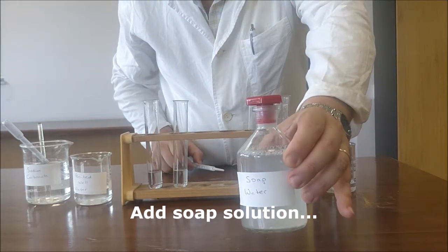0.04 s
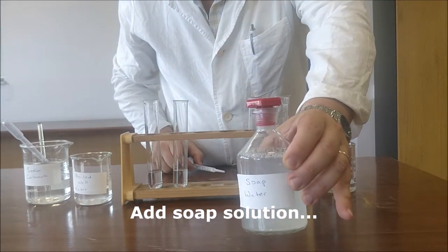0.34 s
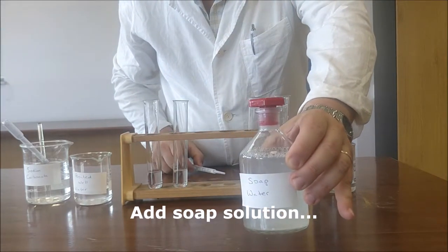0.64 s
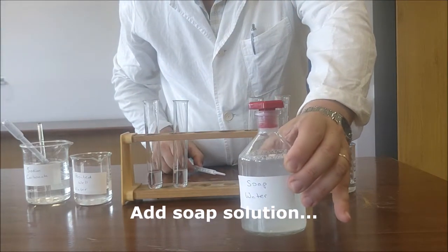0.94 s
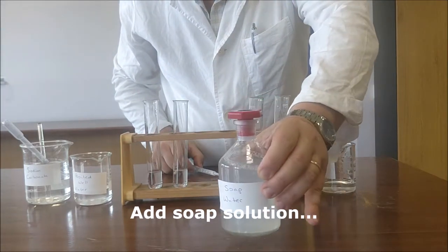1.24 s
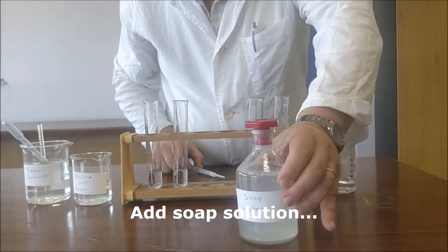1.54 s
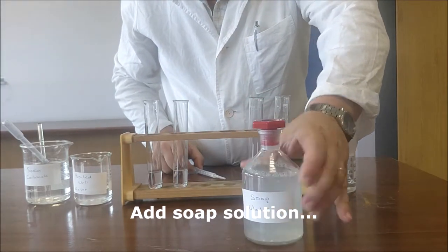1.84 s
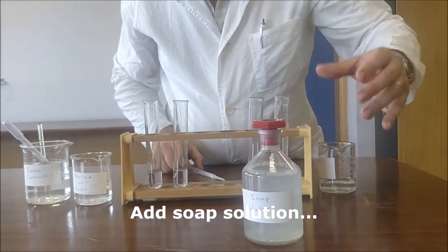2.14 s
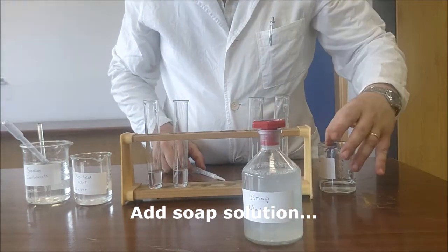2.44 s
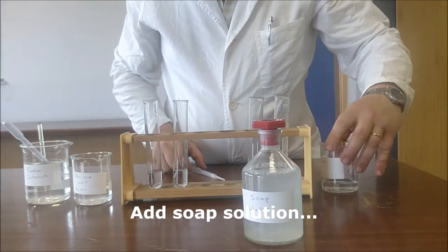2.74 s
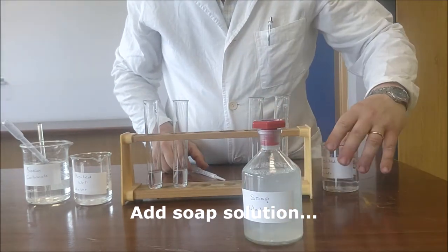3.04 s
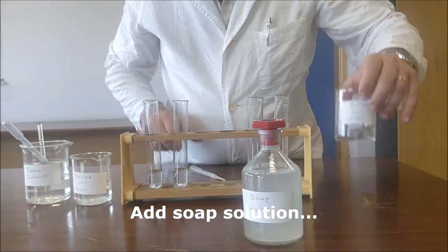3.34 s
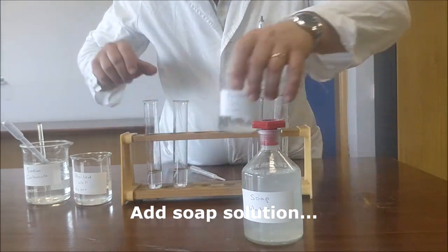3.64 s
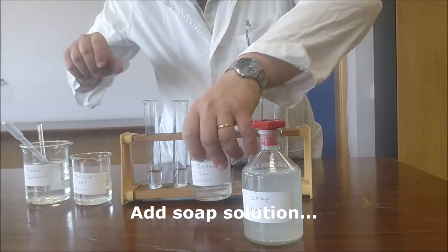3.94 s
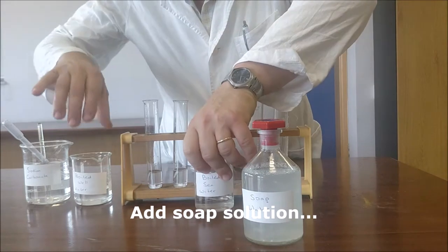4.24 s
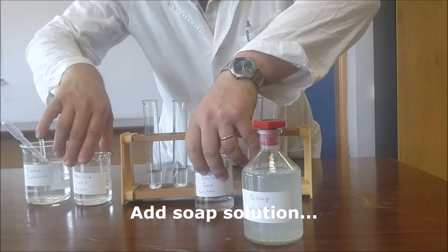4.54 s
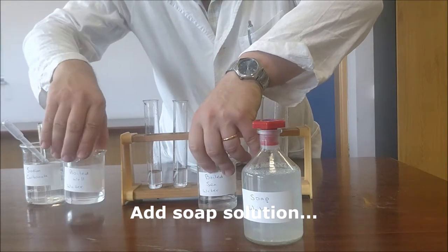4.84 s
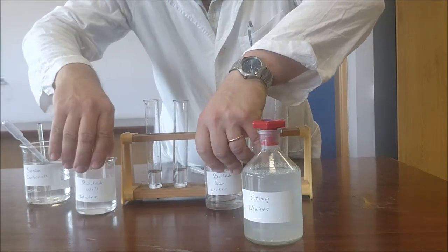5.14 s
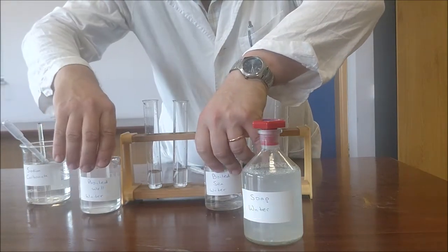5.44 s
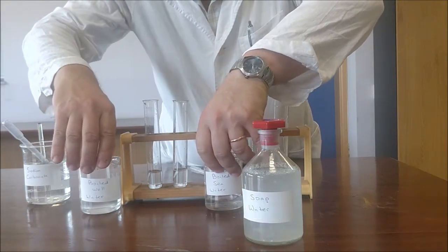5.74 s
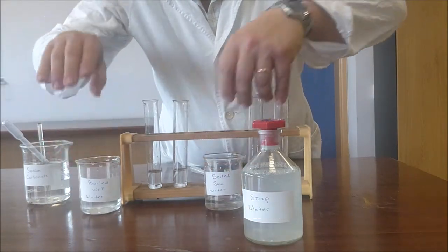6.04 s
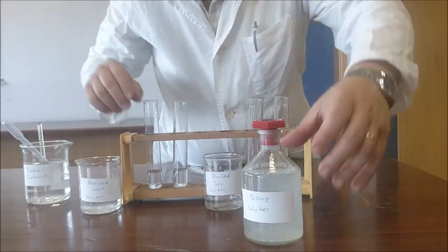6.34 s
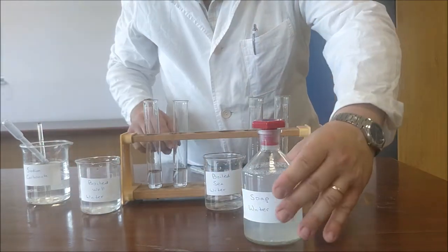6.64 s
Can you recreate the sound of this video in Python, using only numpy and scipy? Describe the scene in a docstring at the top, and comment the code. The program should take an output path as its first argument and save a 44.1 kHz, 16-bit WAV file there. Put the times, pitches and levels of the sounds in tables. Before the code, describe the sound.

A full glass bottle is set down on a wooden lab bench with a booming knock. A beaker strikes its edge and rings briefly, then lands flat and rocks. A second beaker is put down, followed by a few gentle knocks. In between, fingers tick on glass, glass rubs on wood and sleeves rustle faintly. A stereo microphone picks up a short room echo and steady low hum with ventilation.

```python
"""A wooden lab bench, heard on a stereo microphone over mains hum, ventilation and faint, far chirps.
At 1.5 s a full bottle is set down: it rings, the bench top booms and the knock dies away in the room.
A part-filled beaker strikes its edge at 2.8 s and sings until gripped, then lands flat and rocks at 4.1 s.
A second beaker lands at 5.1 s and a few gentle knocks follow. Between the knocks, sleeves rustle,
fingers tick on the glass and glass rubs on the wood."""
import sys
import numpy as np
from scipy import signal
from scipy.fft import rfft, irfft
from scipy.io import wavfile
from scipy.ndimage import uniform_filter1d

SR = 44100
rng = np.random.default_rng(int(sys.argv[2]) if len(sys.argv) > 2 else 0)


def wav_out(sig):
    """Save sig, one row per channel (or a flat mono array), as 16-bit PCM at SR to the path in sys.argv[1]."""
    wavfile.write(sys.argv[1], SR, np.round(np.clip(np.atleast_2d(sig).T, -1, 1) * 32767).astype(np.int16))


N = 299968
TIME = np.arange(N) / SR


def undb(db):
    """Decibels to gain."""
    return 10 ** (np.asarray(db) / 20)


def on_log(hz, points):
    """Read (Hz, value) points along a log-frequency axis."""
    point_hz, value = np.transpose(points)
    return np.interp(np.log(np.maximum(hz, 1)), np.log(point_hz), value)


def tint(x, points):
    """Filter by a (Hz, dB) curve."""
    size = x.shape[-1]
    return irfft(rfft(x) * undb(on_log(np.fft.rfftfreq(size, 1 / SR), points)), size)


def level(x, db):
    """Scale to an rms level."""
    return x * undb(db) / np.sqrt(np.mean(x ** 2))


def pan(db):
    """Left and right gains for a left-minus-right level difference."""
    return undb(np.array([[db], [-db]]) / 2)


def add(out, start_s, sound):
    """Mix a sound in from start_s."""
    start = int(start_s * SR)
    part = sound[..., :N - start]
    out[:, start:start + part.shape[-1]] += part


def microphones(x, pan_db, lag_ms, shadow_hz=800):
    """Two microphone ports: the right hears lag_ms later, and pan_db weaker well above shadow_hz."""
    size = 2 * len(x)
    hz = np.fft.rfftfreq(size, 1 / SR)
    shade_db = pan_db * hz ** 4 / (hz ** 4 + shadow_hz ** 4) / 2
    delay_s = np.maximum([[-lag_ms], [lag_ms]], 0) / 1000
    response = undb([shade_db, -shade_db]) * np.exp(-2j * np.pi * hz * delay_s)
    return irfft(rfft(x, size) * response, size)[:, :len(x)]


def diffuse(size):
    """Noise from all round the microphones: alike in the bass, unrelated in the treble."""
    # likeness of left and right: frequency_hz, correlation
    likeness = [(100, 1), (300, 0.85), (600, 0.41), (1200, 0.01), (2500, 0), (8000, 0)]
    alike = np.clip(on_log(np.fft.rfftfreq(size, 1 / SR), likeness), -.99, .99)
    mid, side = rfft(rng.standard_normal((2, size))) * np.sqrt([(1 + alike) / 2, (1 - alike) / 2])
    return irfft(np.array([mid + side, mid - side]), size)


def flicker(depth_db, rate_hz):
    """A gain that wanders smoothly at random, by depth_db rms."""
    step = int(SR / rate_hz)
    held = np.repeat(rng.standard_normal(N // step + 1), step)
    smooth = uniform_filter1d(uniform_filter1d(held, step), step)[:N]
    return undb(depth_db * level(smooth, 0))


def swell(peak_s, rise_s):
    """A smooth rise to 1 at peak_s and an equally long fall."""
    return np.cos(np.pi * np.clip((TIME - peak_s) / rise_s / 2, -.5, .5)) ** 4


def wavering(hz, width_hz):
    """A tone whose level and phase wander, so that it fills a narrow band; rms 1."""
    phase = 2 * np.pi * np.cumsum(hz * np.ones(N)) / SR
    soften = signal.butter(2, width_hz / 2, fs=SR, output="sos")
    a, b = signal.sosfilt(soften, rng.standard_normal((2, N + SR)))[:, SR:]
    return level(a * np.cos(phase) + b * np.sin(phase), 0)


def ring(modes):
    """One second of decaying (pitch_hz, t60_s, level_db) modes after a unit blow."""
    t = TIME[:SR]
    return sum(undb(db - 60 * t / t60) * np.sin(2 * np.pi * hz * t) for hz, t60, db in modes)


def ring_each(table):
    """One ring for each level column of a table of modes."""
    hz, t60, *columns = np.transpose(table)
    return [ring(zip(hz, t60, db)) for db in columns]


def hum(motor_hz=82.5, motor_db=-62):
    """The mains hum beats against an unsteady motor; the equipment whines thinly above."""
    # steady tones of mains and motors: pitch_hz, rms_db
    tones = [(99.97, -51.3), (139, -71), (199.94, -75)]
    # thin tones of the equipment: pitch_hz, width_hz, rms_db
    whines = [(418, 12, -76), (13911, 6, -93), (14013, 8, -93), (14212, 16, -97)]
    mains = np.sqrt(2) * sum(undb(db) * np.sin(2 * np.pi * (hz * TIME + rng.random())) for hz, db in tones)
    motor = undb(motor_db) * wavering(motor_hz, width_hz=2.15)
    whine = sum(undb(db) * wavering(hz, width) for hz, width, db in whines)
    return microphones(mains, pan_db=0, lag_ms=0.35) * pan(db=-1.5) + motor + whine


def drones(fade_s=0.2):
    """Faint drones come and go in the background, each wavering about one pitch."""
    # spells of droning: start_s, end_s, pitch_hz, rms_db
    spells = [(0, 2.5, 554, -74), (3.4, 6.8, 649.4, -74), (6.1, 6.54, 652, -69.5), (6.5, 7.7, 619, -75)]
    out = 0
    for start, end, hz, db in spells:
        fade = np.clip(.5 + np.minimum(TIME - start, end - TIME) / fade_s, 0, 1)
        out = out + undb(db) * fade * wavering(hz, width_hz=16)
    return out


def ventilation():
    """Room tone: moving air and microphone hiss over the low rumble of the building."""
    # spectrum of air and hiss: frequency_hz, gain_db
    air_colour = [(80, -28.5), (135, -0.5), (220, 0), (330, -8), (480, -10), (640, -10.5), (850, -14.5),
                  (1100, -19), (1600, -25), (4200, -26), (9200, -36), (12000, -33), (14000, -26.5),
                  (15500, -29.5)]
    # spectrum of the rumble: frequency_hz, gain_db
    rumble_colour = [(14, -20), (20, 1), (30, 4), (45, 1.5), (56, 3), (72, 1), (92, -9.5), (122, 4),
                     (170, -23), (400, -53)]
    air = level(tint(diffuse(N), air_colour), db=-60)
    rumble = level(tint(diffuse(N), rumble_colour), db=-61.5)
    return air + rumble * flicker(depth_db=1.5, rate_hz=8)


def chirps(rise_s=.15, fall_octaves_per_s=2.4):
    """Faint, far chirps: two wavering whistles slide downwards together in a little hiss."""
    # each chirp: peak_s, level_db
    events = [(0.345, -73), (1.522, -76), (2.511, -77.5), (3.065, -72.5), (3.61, -73), (6.015, -73.5)]
    # the whistles and the hiss: pitch_at_peak_hz, width_hz, gain_db
    strands = [(3500, 220, -7), (3950, 220, -5), (4100, 1300, -2)]
    glide, loudness, whistles = 0, 0, 0
    for s, db in events:
        sounding = abs(TIME - s) < rise_s
        glide += sounding * 2 ** (-fall_octaves_per_s * np.clip(TIME - s, -rise_s, rise_s))
        loudness += sounding * undb(db) * swell(s, rise_s)
    for hz, width, db in strands:
        whistles += undb(db) * np.array([wavering(hz * glide, width) for _ in range(2)])
    return whistles * loudness * flicker(depth_db=3, rate_hz=60)


def push(x, contact_ms):
    """A blow of finite length: the longer the contact, the duller the sound."""
    force = np.sin(np.pi * np.minimum(TIME[:SR // 100] * 1000 / contact_ms, 1))
    return -signal.fftconvolve(x, force / force.sum())[:len(x)]


def radiate(x, low_hz):
    """Air slips round a slowly moving body, so the deep bass is not radiated."""
    return signal.sosfilt(signal.butter(2, low_hz, "high", fs=SR, output="sos"), x)


def vessel_rings():
    """Glass standing on wood rings briefly; returns a ring for each kind of contact."""
    # modes of the full bottle: pitch_hz, t60_s, level_db
    bottle = [(135, .12, -35), (223, 0.063, -37.5), (325, 0.078, -36.5), (386, 0.084, -36.5),
              (567, 0.0097, -34), (667, 0.023, -24.5), (785, 0.026, -27.5), (1066, 0.0091, -22),
              (1770, 0.013, -29.5), (2160, 0.013, -29.5), (3880, .15, -45), (4290, .17, -44)]
    # modes of the first beaker, by how it meets the wood: pitch_hz, t60_s, flat_db, edge_db, rock_db
    first_beaker = [(475, 0.078, -46, -37.5, -44), (627, 0.11, -35.5, -37, -34),
                    (782, 0.09, -48, -37.5, -54), (937, 0.026, -38, -68, -65),
                    (1052, 0.046, -21.5, -30, -21.5), (1112, 0.028, -28, -44, -25.5),
                    (1248, 0.031, -37, -24.5, -42), (1520, 0.019, -27.5, -39.5, -31),
                    (1806, 0.037, -33.5, -25.5, -34), (2050, 0.028, -39.5, -40, -50),
                    (2740, 0.052, -66, -47, -68), (3760, 0.084, -47.5, -68, -58),
                    (6800, .03, -51, -58, -55)]
    # modes of the second beaker: pitch_hz, t60_s, level_db
    second_beaker = [(316, 0.054, -28.5), (452, 0.083, -38), (629, 0.088, -35), (659, 0.095, -26.5),
                     (773, 0.067, -28), (1124, 0.058, -21.5), (1224, 0.034, -17.5), (1490, 0.028, -23),
                     (1710, 0.042, -25), (1930, 0.054, -34.5), (2230, 0.044, -40), (3340, .015, -44),
                     (7030, .06, -35), (7350, .12, -42), (13500, .15, -38)]
    flat, edge, rock = ring_each(first_beaker)
    return dict(bottle=ring(bottle), edge=edge, flat=flat, rock=rock, second=ring(second_beaker))


def bench_booms(build_s=0.029):
    """Bending waves take a moment to fill the bench top, which answers differently at each spot."""
    # modes of the bench top, by spot struck: pitch_hz, t60_s, bottle_db, edge_db, flat_db, second_db
    modes = [(157.4, 0.33, -33, -49.5, -43.5, -41), (219.2, 0.35, -36, -52, -39, -40),
             (300.1, 0.34, -51, -58, -40.5, -32.5), (315.4, 0.33, -31, -53, -41.5, -33),
             (383, 0.29, -38, -66, -54, -60), (436, 0.3, -28.5, -51, -31, -53),
             (543, 0.22, -37, -54, -52, -58), (608, 0.41, -37, -53, -49, -40.5),
             (664, 0.34, -49, -62, -59, -52), (700, 0.27, -40, -65, -58, -62),
             (757, 0.35, -46, -48, -44, -42.5), (842, 0.26, -47, -62, -57, -60),
             (1045, 0.36, -47.5, -46.5, -59, -57), (1244, 0.48, -64, -52, -56, -50)]
    filling = 1 - np.exp(-TIME[:SR] / build_s)
    bottle, edge, flat, second = ring_each(modes) * filling
    return dict(bottle=bottle, edge=edge, flat=flat, rock=flat, second=second)  # rocks where it landed


def knocks(softness=0.53, max_contact_ms=0.94, crack_s=0.0047, flex_s=0.0041, flex_db=3):
    """Vessels meet the bench, brighter the harder they land; returns direct sound and room send."""
    # glass meeting wood: start_s, contact, force_db, boom_db
    blows = [(1.4745, "bottle", 5.5, -1.5), (1.506, "bottle", -9, -22), (1.539, "bottle", -14, -22),
             (2.6917, "edge", -14.5, -15), (2.8448, "edge", -4, 0.5), (4.1497, "flat", 1.4, -0.5),
             (4.2965, "rock", -10, -12.5), (4.537, "flat", -29, -21), (4.711, "flat", -25.5, -27),
             (4.972, "second", -21, -17), (5.0584, "second", -2, 0), (5.258, "second", -23.5, -22),
             (5.7422, "flat", -16, -16.5), (5.760, "rock", -29, -27), (5.777, "flat", -19, -25),
             (5.821, "flat", -28, -22), (5.866, "flat", -30, -26), (6.766, "bottle", -28, -25)]
    # by contact, for a 0 dB blow: contact_ms, low_cut_hz, room_db, room_low_cut_hz, crack_db
    contacts = {"bottle": (0.82, 130, -1, 138, -59), "edge": (0.18, 242, 1.5, 380, -58),
                "flat": (0.27, 298, -2.5, 265, -57), "rock": (0.32, 480, -2.5, 400, -58),
                "second": (0.26, 290, -2, 635, -49.5)}
    # where each contact lies before the microphones: left_minus_right_db, right_lag_ms
    places = {"bottle": (2.5, .1), "edge": (0, -.02), "flat": (4.5, .1), "rock": (3, .12),
              "second": (5.5, .14)}
    rings, booms, t = vessel_rings(), bench_booms(), TIME[:SR]
    direct, sent = np.zeros((2, N)), np.zeros((1, N))
    for s, contact, force_db, boom_db in blows:
        firm_ms, low_hz, room_db, room_low_hz, crack_db = contacts[contact]
        force = undb(force_db)
        contact_ms = min(firm_ms * force ** -softness, max_contact_ms)
        vessel = force * push(radiate(rings[contact], low_hz), contact_ms)
        knock = vessel + force ** .7 * crack(crack_db, crack_s)
        boom = undb(boom_db) * push(booms[contact], contact_ms)
        add(direct, s, microphones(knock + boom, *places[contact]))
        # the first flex of the board feeds the room most; gentle touches get a larger share of tail
        flex = radiate(knock * np.exp(-t / flex_s), room_low_hz)
        add(sent, s, flex * undb(room_db + flex_db - 0.31 * force_db))
    return direct, sent


def crack(db, decay_s):
    """The rough glass foot cracks briefly on the varnish."""
    # spectrum of the crack: frequency_hz, gain_db
    colour = [(800, -17), (2200, 0), (3600, 0), (4500, -10), (5600, -4), (7200, 0), (8200, -35),
              (11000, -18), (13500, -2.5), (15500, -22)]
    return level(tint(rng.standard_normal(SR), colour), db) * np.exp(-TIME[:SR] / decay_s)


def room(x, wet_db=-4, build_s=0.0028):
    """The lab's diffuse tail builds over the first reflections; each band dies at its own rate."""
    # bands of the tail: centre_hz, t60_s, level_db
    bands = [(126, 0.53, 8.5), (251, 0.9, 6), (543, 0.6, 4), (970, 0.65, -5.5), (2090, 0.49, -7.5),
             (4000, 0.54, -1.5), (7940, 1, 6), (14000, .2, 1)]
    t, spectrum, tail = TIME[:SR], rfft(diffuse(SR)), 0
    centres, hz = [row[0] for row in bands], np.fft.rfftfreq(SR, 1 / SR)
    for share, (_, t60, db) in zip(np.eye(len(bands)), bands):
        band = irfft(spectrum * on_log(hz, list(zip(centres, share))), SR)
        fade = undb(-60 * t / t60) * (1 - np.exp(-(t / build_s) ** 2))
        tail = tail + band * fade * undb(db) / np.sqrt(np.sum(fade ** 2))
    return undb(wet_db) * signal.fftconvolve(x, tail, axes=1)[:, :N]


def rustles():
    """Hands and coat sleeves rustle softly over the bench."""
    # each movement: peak_s, rise_s, level_db
    moves = [(1.515, .17, -71), (1.79, 0.3, -71.5), (4.543, 0.45, -69), (5.5, 0.7, -73), (5.902, 0.4, -74)]
    # spectrum of cloth and skin: frequency_hz, gain_db
    colour = [(800, -1), (2800, -0.5), (4000, 3), (5400, 2.5), (9000, -18), (13000, -1.5), (15500, -11.5)]
    cloth = level(tint(diffuse(N) * flicker(depth_db=1.5, rate_hz=70), colour), 0)
    return cloth * sum(undb(db) * swell(s, rise) for s, rise, db in moves)


def slides():
    """Glass dragged a little over the bench catches and slips on the varnish."""
    # each drag: peak_s, rise_s, level_db
    drags = [(2.69, 0.17, -60), (3.037, 0.13, -60), (4.54, .03, -60), (4.705, 0.06, -60.5),
             (4.915, .09, -56), (5.81, 0.18, -61)]
    # spectrum of glass rubbing on wood: frequency_hz, gain_db
    colour = [(300, -12), (450, 9), (600, 9), (800, 4), (1080, 8), (1400, -2), (2000, -5), (3000, -13),
              (5000, -20), (6900, -11), (9000, -69), (12500, -9), (15500, -37)]
    rub = level(tint(diffuse(N) * flicker(depth_db=3, rate_hz=100), colour), 0)
    return rub * sum(undb(db) * swell(s, rise) for s, rise, db in drags)


def ticks(decay_s=0.0026, top_hz=9000):
    """A hand ticks on glass: bright crackle, with a thin ping or a lower clink by where it touches."""
    # each touch: start_s, level_db, top_treble_db, left_minus_right_db, ping_db, clink_db
    touches = [(2.70, -67, 11, 3, -6, -15), (3.056, -65, 11, 5, -12, -15), (4.383, -55, -5, 4, 3, -15),
               (4.4198, -47, 3.5, 2, 1, -12), (4.428, -52, 0, 6, 3, -15), (4.501, -61, -4, 2, 0, -15),
               (4.57, -56, 0, 2, 1, -8), (4.9709, -50, 6, 7, -5, 1), (5.355, -57, 4, 3, -2, -12),
               (5.379, -60, 4, 6, -6, -12), (5.806, -52.5, -1, 11, -6, 4), (5.814, -59, -2, 8, -6, 5)]
    # modes of the ping: pitch_hz, t60_s, level_db
    ping_modes = [(5370, 0.05, -16), (5455, 0.074, -14.5), (5550, 0.042, -18.5), (13160, .06, -19),
                  (14400, .05, -16)]
    # modes of the clink: pitch_hz, t60_s, level_db
    clink_modes = [(2430, .12, -24), (2610, .05, -14)]
    # spectrum of the crackle: frequency_hz, gain_db
    colour = [(1500, -2), (2800, 0), (4500, -6), (5450, 3), (6100, -3), (7700, -6.5), (10000, -16),
              (13500, 4), (15500, 0)]
    out, t = np.zeros((2, N)), TIME[:SR // 5]
    ping, clink = ring(ping_modes)[:len(t)], ring(clink_modes)[:len(t)]
    for s, db, top_db, pan_db, ping_db, clink_db in touches:
        crackle = level(tint(rng.standard_normal((2, len(t))), colour), 0) * np.exp(-t / decay_s)
        tick = crackle + undb(ping_db) * ping + undb(clink_db) * clink
        shelf = [(top_hz / 2, 0), (top_hz, top_db)]
        add(out, s, undb(db) * tint(tick, shelf) * pan(pan_db))
    return out


def beaker_wall(strike_s=2.8437, grip_s=2.966, grip_db=-11.5, lift_s=3.036, lift_db=-19):
    """The first beaker sings when its edge strikes, is hushed by a grip, and stirs again as it lifts."""
    # modes of the thin wall, ringing free: pitch_hz, t60_s, level_db
    modes = [(1843, .07, -43.5), (2001, 0.75, -45.5), (2022, .12, -44), (3720, 0.13, -57),
             (3724, 0.65, -72), (5500, .2, -73), (6860, .2, -83)]
    closing_s, held_decay_s = 0.0058, .035
    out, wall = np.zeros((2, N)), ring(modes) * pan(db=3)
    add(out, strike_s, wall)
    grip = (1 + np.tanh((TIME - grip_s) / closing_s)) / 2
    out *= undb(grip_db * grip)
    add(out, lift_s, undb(lift_db) * wall * np.exp(-TIME[:SR] / held_decay_s))
    return out


def judder():
    """The second beaker's foot judders briefly on the wood."""
    return undb(-55.5) * wavering(hz=820, width_hz=220) * swell(peak_s=4.979, rise_s=.035)


def squeak(pitch_hz=3015, width_hz=30, octave_db=-6):
    """A fingertip squeaks faintly on glass: a wavering tone and its octave."""
    tone = wavering(pitch_hz, width_hz) + undb(octave_db) * wavering(2 * pitch_hz, 2 * width_hz)
    return undb(-78.5) * tone * swell(peak_s=5.44, rise_s=0.27)


def scene(tick_room_db=-7):
    """At the microphones: the bench, the room's echo of knocks and ticks, and the background."""
    direct, sent = knocks()
    ticking = ticks()
    echo = room(sent + undb(tick_room_db) * ticking.mean(axis=0))
    bench = direct + ticking + beaker_wall() + slides() + judder() + rustles() + squeak()
    return bench + echo + chirps() + hum() + drones() + ventilation()


def record(dry, top_hz=15750):
    """The camera's microphone input cuts the top treble steeply."""
    return signal.sosfilt(signal.ellip(10, .1, 70, top_hz, fs=SR, output="sos"), dry)


dry = scene()
out = record(dry)
wav_out(out)
```